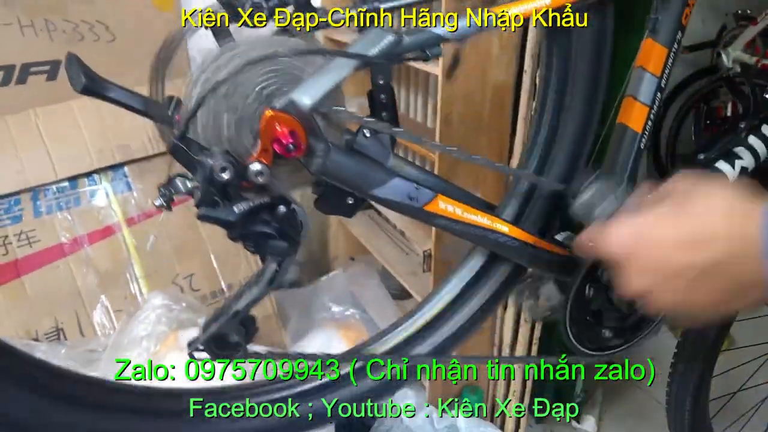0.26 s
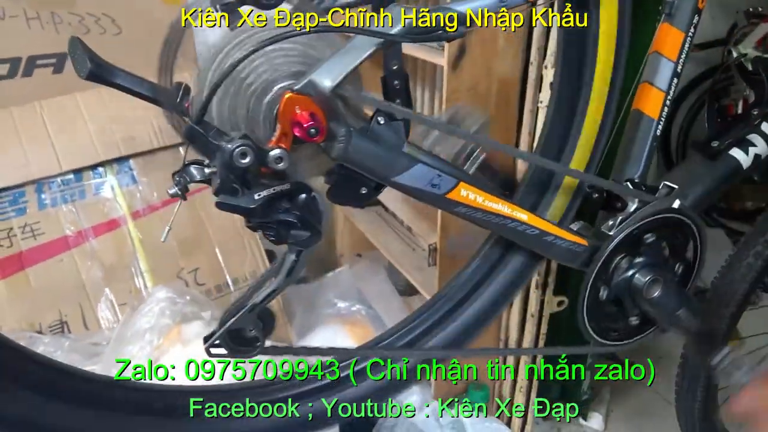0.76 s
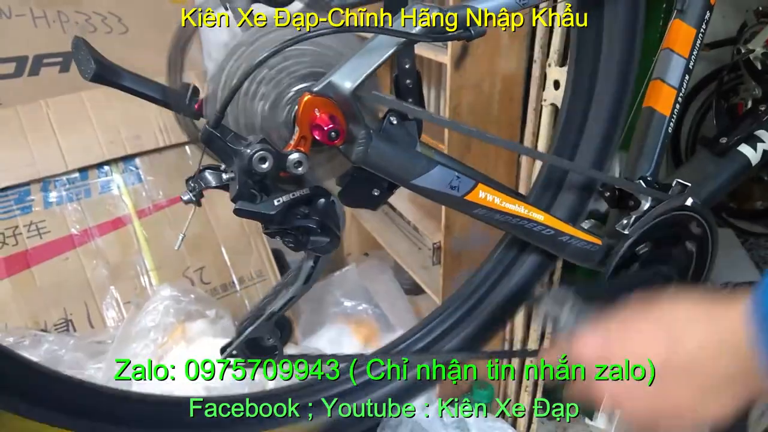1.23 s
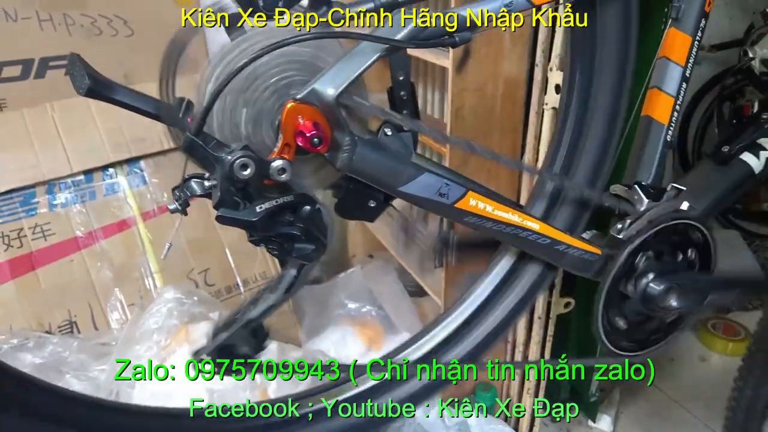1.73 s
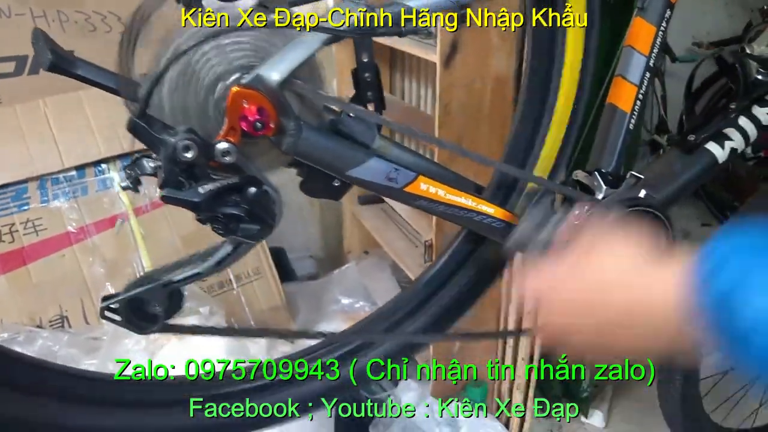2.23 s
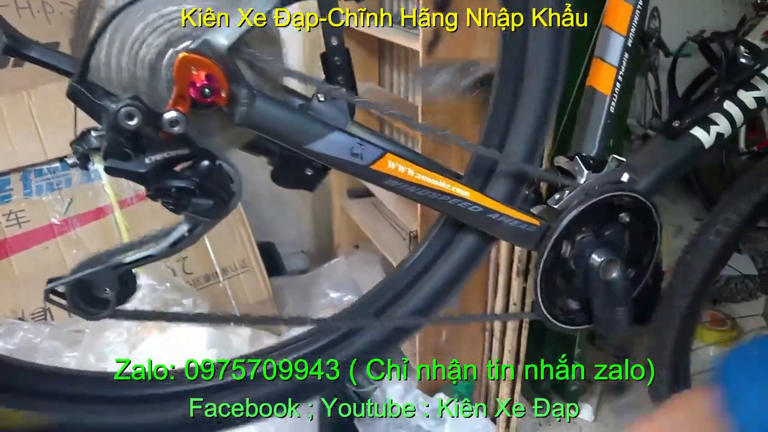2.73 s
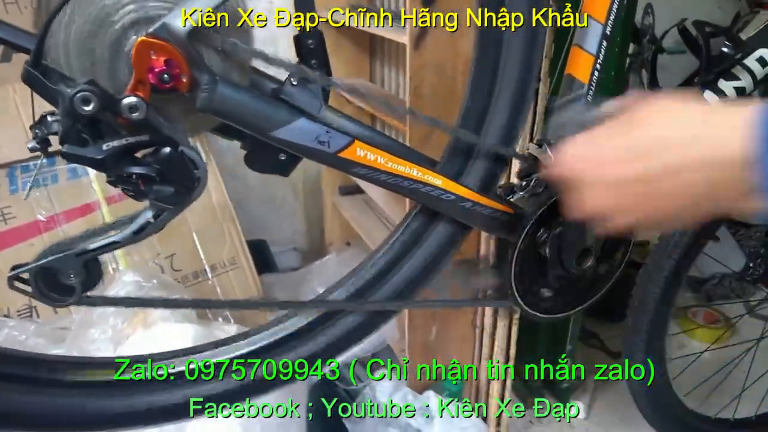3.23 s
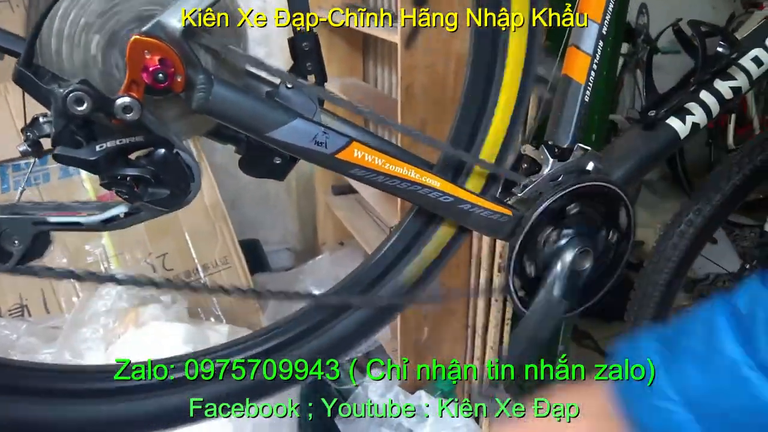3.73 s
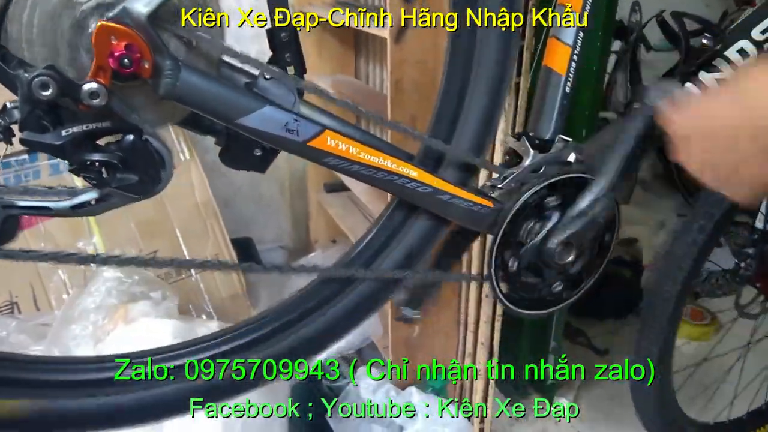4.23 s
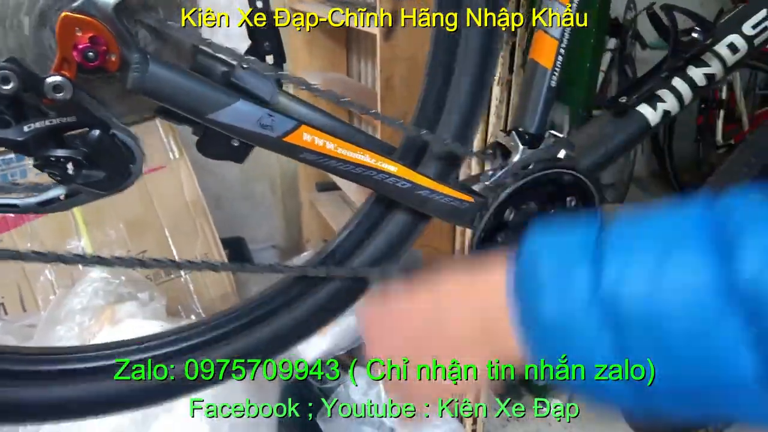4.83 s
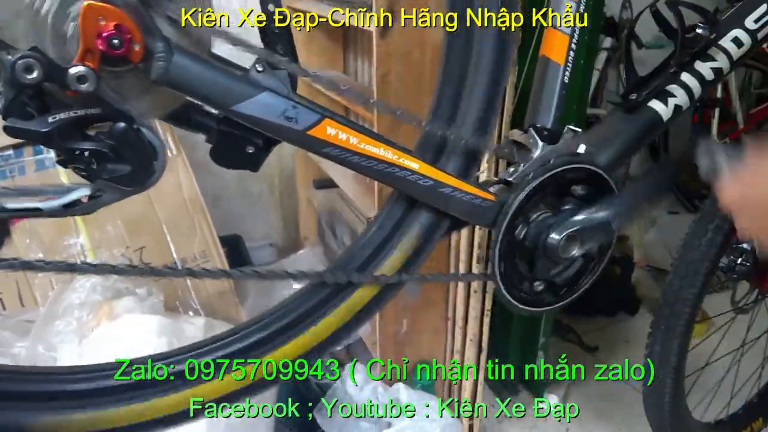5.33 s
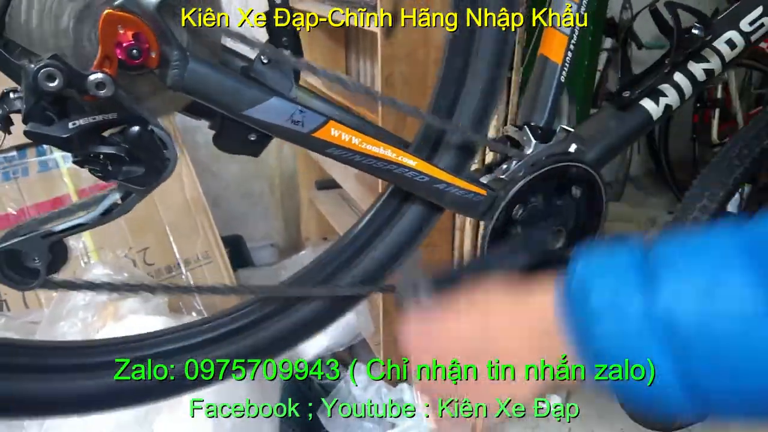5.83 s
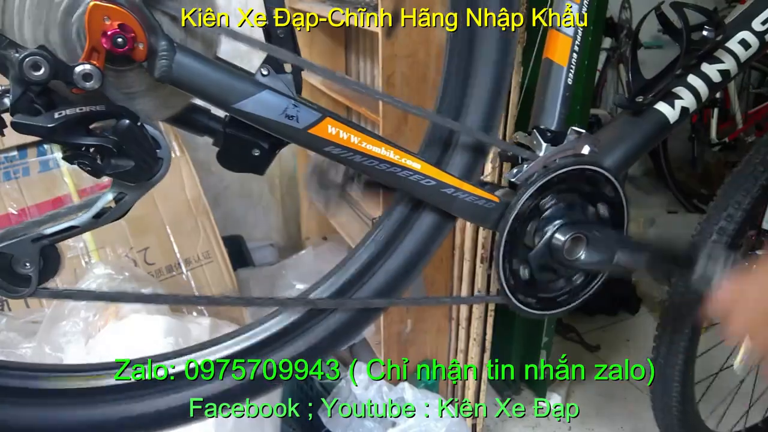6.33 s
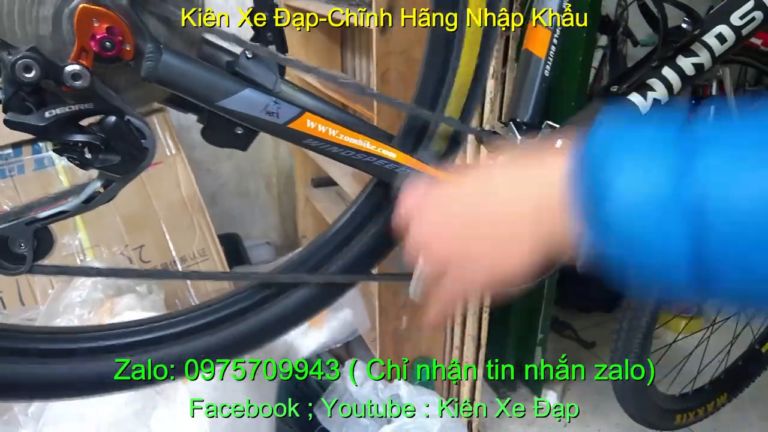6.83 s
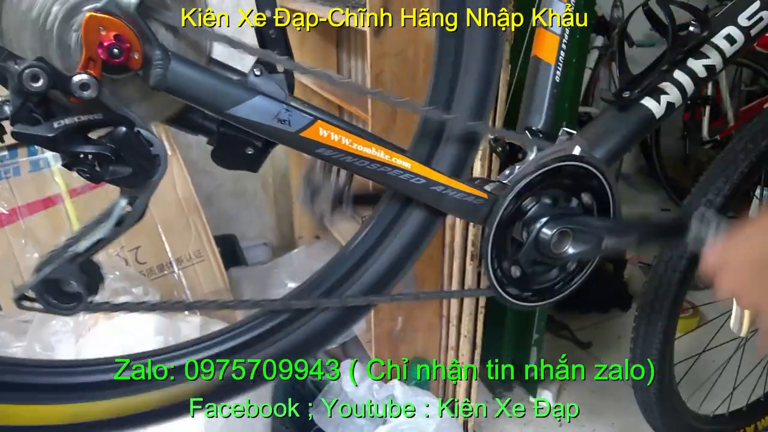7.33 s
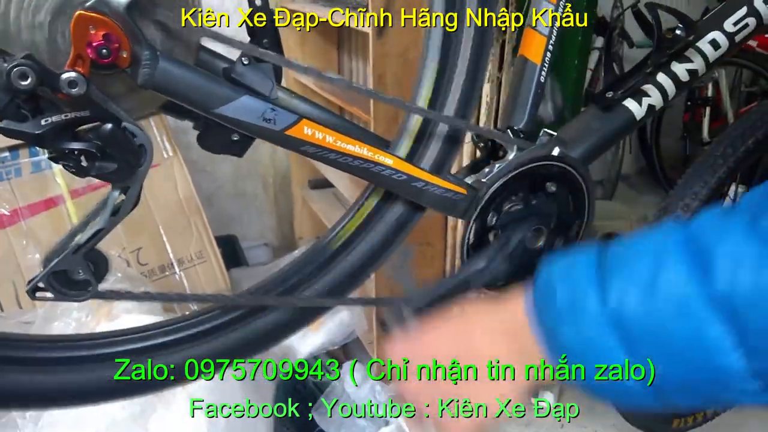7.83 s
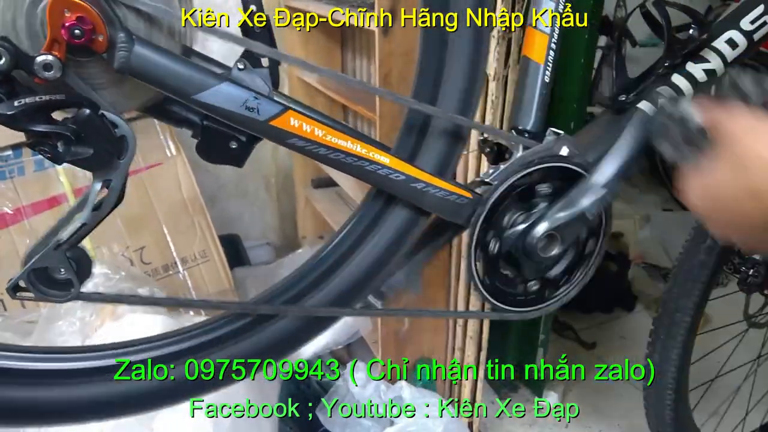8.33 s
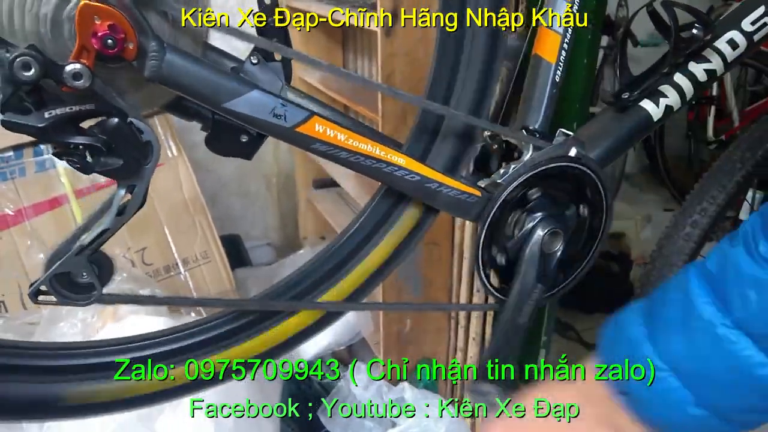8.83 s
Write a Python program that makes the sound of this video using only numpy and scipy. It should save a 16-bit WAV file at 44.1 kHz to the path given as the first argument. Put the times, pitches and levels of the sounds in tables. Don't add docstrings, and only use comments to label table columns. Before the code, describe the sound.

A bicycle chain runs over cogs with rapid bright ticks and loose metallic chatter, heard close in a small room with short echoes. Crisp clunks mark gear changes early and again late. Between them, hub pawls snap in uneven clicks with a short metallic ring. Soft bumps thud in the stand, frame tubes are knocked near the end, and a hand slides lightly on a tube.

```python
import sys
import numpy as np
from scipy import signal
from scipy.fft import rfft, irfft, next_fast_len
from scipy.io import wavfile
from scipy.ndimage import uniform_filter1d

SR = 44100
rng = np.random.default_rng(int(sys.argv[2]) if len(sys.argv) > 2 else 0)


def voltage_ratio(decibels):
    exponent = np.asarray(decibels, float) / 20
    return 10 ** exponent


def unload_wav(signal):
    wavfile.write(
        sys.argv[1],
        SR,
        np.round(np.clip(np.atleast_2d(signal).T, -1, 1) * 32767).astype(np.int16),
    )


N = 400428
SIZE = next_fast_len(N + SR)
HZ = np.fft.rfftfreq(SIZE, 1 / SR)

# (time [s], level [dB])
CHAIN_RATTLE = [(0, -35), (.45, -49), (2.0, -52.5), (2.9, -47.5), (3.3, -42.5), (4.2, -42), (4.6, -48),
                (5.1, -36), (5.4, -48), (5.6, -49.5), (6.75, -53), (7.4, -49), (8.3, -54.5), (9.08, -50.5)]
# (time [s], level [dB], time to fade by 60 dB [s])
CHAIN_SHAKES = [(1.411, -16.5, 0.51), (1.5835, -16.5, 0.33), (2.072, -25, 0.82), (3.0994, -13, 0.4),
                (3.7234, -9, 0.088), (4.9576, -19, 0.99), (5.1567, -9.5, 0.17), (5.2475, -13, 0.68),
                (6.8224, -21, 0.4), (6.9446, -21.5, 1), (7.08, -17.5, 0.42), (7.1714, -24.5, 0.97)]
# (time [s], level [dB])
STAND_RUMBLE = [(0, -58.5), (1.3, -61), (1.6, -56), (2.2, -57.5), (3.9, -57.5), (4.6, -57.5), (5.2, -48),
                (5.6, -59.5), (6.7, -60), (7.2, -50.5), (8.2, -60), (9.08, -54)]
# (time [s], level [dB])
HAND_SWAY = [
    (0.0, -66.5),
    (1.85, -65.5),
    (7.03, -64.5),
    (7.16, -57),
    (7.86, -67.5),
    (9.08, -55.5),
]
# (time [s], snap [dB], ring of the cogs above the snap [dB])
RATCHET_MOMENTS = [(0.0183, -26, -2.5), (0.081, -25.5, 1.5), (0.1894, -21.5, -4.5), (0.3128, -23, -0.5),
                   (3.811, -24, -4), (3.923, -22, -1.5), (4.0132, -23, -3), (4.1749, -23, -4.5),
                   (4.3064, -23, 0), (4.4, -24.5, -0.5), (4.4543, -26, 5.5), (4.5374, -23.5, -2.5),
                   (4.6435, -27.5, 5.7), (4.7165, -25.5, 0.6), (4.7724, -25, 1.3), (4.9075, -23.5, 0.3),
                   (5.005, -22, -1)]
RATCHET_COUNT = [0, 1, 3, 5, 6, 8, 10, 14, 17, 19, 20, 21, 22, 23, 24, 27, 29]
# (time [s], snap [dB], ring above the snap [dB])
PAWL_SLIPS = [(0.5819, -25.5, -3), (1.0063, -28.5, -0.5), (2.979, -25, 1), (3.0792, -22, -1),
              (3.1898, -23.5, -0.5), (3.2323, -24.5, -14), (3.297, -23.5, 4), (3.3251, -32.5, -3),
              (3.4439, -25.5, 4), (3.5234, -24.5, 2.5), (3.7338, -22.5, -1.5), (4.947, -31, -4),
              (5.0333, -22, -2), (5.072, -22.5, -3.5), (5.0888, -24.5, -6), (5.1118, -25, 5.5),
              (5.1569, -27, 4), (5.1717, -32, 9.5), (5.1859, -22.5, -1.5), (5.2453, -21, -13),
              (5.2714, -22, -13), (5.2919, -23, -4), (5.3403, -23.5, 0), (5.377, -21.5, -1.5),
              (5.408, -25, -6), (5.915, -31, -31), (6.8259, -25, -1.5), (7.1248, -24, -2)]
# (time [s], seating force [dB])
CHAIN_MOMENTS = [(0.4334, -40), (0.8484, -42), (1.3811, -42), (2.0382, -39.5), (2.742, -44.5),
                 (5.5172, -41), (5.7452, -46.5), (5.8403, -42.5), (6.1392, -42), (6.3117, -43.5),
                 (6.7278, -45.5), (6.9456, -48), (7.4312, -40), (7.6041, -41), (8.0493, -42.5),
                 (8.2925, -44.5), (8.41, -42.5), (9.0549, -42.5)]
CHAIN_COUNT = [0, 16, 36, 62, 89, 192, 200, 203, 214, 220, 235, 242, 260, 266, 282, 291, 295, 319]
# (time [s], level [dB])
STIFF_LINKS = [(1.0186, -44), (1.747, -42), (1.9474, -42), (1.963, -48), (2.1123, -48), (2.1293, -41),
               (2.18, -42), (2.531, -39), (2.6893, -35), (2.7604, -36), (3.028, -46), (3.3575, -40),
               (3.4185, -40), (3.6503, -37.5), (3.7774, -35.5), (5.4676, -37.5), (5.6041, -30),
               (5.624, -38), (5.8681, -42), (5.8805, -43), (6.087, -38.5), (6.1385, -43), (6.7623, -43),
               (6.8838, -34.5), (6.99, -46), (7.2385, -35), (7.678, -34), (7.7856, -36.5), (5.7744, -38),
               (8.8692, -41)]
# (time [s], thump [dB], edge above the thump [dB])
STAND_BUMPS = [(0.823, -40.5, -17), (0.926, -44, -21), (1.5, -32.5, -13), (1.962, -41.5, -24),
               (4.764, -41.5, 4.5), (5.181, -47, 4), (5.284, -34.5, 5), (6.136, -42, -16),
               (6.185, -40.5, -30), (6.892, -40.5, 4), (7.089, -37, -1), (7.64, -36.5, -7),
               (8.12, -38.5, -10.5)]
# (time [s], snap [dB], ring above snap [dB], thud above snap [dB], rattle [s])
GEAR_CLUNKS = [
    (1.4102, -9, -7, -17, 0.0031),
    (1.581, -22.5, 6.5, -12.5, 0.003),
    (2.0722, -17.5, -11, -26, 0.0027),
    (3.098, -12.5, 0, -17, 0.004),
    (3.707, -18, -13, -21, 0.0059),
    (7.077, -38, 7, -27, 0.0032),
    (7.135, -16, -11, -21, 0.0079),
    (7.1644, -10.5, -11.5, -23, 0.0035),
]
# (time [s], low tubes [dB], middle tube above them [dB], sharpness above them [dB])
FRAME_KNOCKS = [
    (7.372, -28, -8, 8.5),
    (7.539, -39, -15, -10),
    (8.436, -32, 1, 8),
    (8.489, -43.5, 3, 6),
    (9.005, -59.5, 7.5, 25.5),
]
# (time [s], level [dB])
HAND_RUB = [
    (8.79, -77),
    (8.84, -49),
    (8.92, -48.5),
    (8.97, -63),
    (9.04, -48),
    (9.08, -63),
]
# (pitch [Hz], width [Hz], level [dB])
RUB_TUBE_TONES = [(802, 27, -1), (888, 32, -0.98)]

# (pitch [Hz], level [dB], time to fade by 60 dB [s])
COG_TONES = [(2027, -15.5, 0.23), (2257, -9.5, 0.12), (2437, -5.5, 0.16), (2808, -3.5, 0.18),
             (3570, -18, 0.36), (3748, -9, 0.14), (4845, -15.5, 0.34), (5696, 3.5, 0.03)]
LINK_TONES = [(3493, -2.5, 0.041), (5860, -5, 0.02), (9450, 20.5, 0.0026)]
TUBE_TONES = [(352.2, 0.5, 0.26), (436.2, 1, 0.24), (880, -4.5, 0.48), (1270, -34, 1), (1303, -14, 0.17),
              (1782, -6, 0.27), (2100, -6, 0.2), (2530, -29, 0.2), (2740, -40, 0.59)]
# (frequency [Hz], level per Hz [dB])
PAWL_NOISE = [(700, -16.5), (1300, -6.5), (1900, -19), (2400, 3), (2900, -1.5), (3700, -0.5), (4300, -11.5),
              (5700, 3.5), (7000, -6), (9200, 1), (12000, -6.5), (14500, 2.5), (16500, -0.5)]
CLUNK_NOISE = [(80, -35), (150, 10), (500, -1.5), (1000, 9), (2200, 1), (3500, 6), (7000, -9.5),
               (13900, -15), (16500, -20)]
ROLLER_NOISE = [(1060, -12), (1800, -2.5), (3140, -4.5), (3350, 7), (3950, -2), (5540, 0.5), (6800, -6),
                (8590, -6.5), (16000, -18.5)]
KNOCK_NOISE = [(71, -52), (120, -0.5), (374, 0), (705, -5.5), (891, 0), (1560, -5), (2780, -5), (6160, -22),
               (9000, -25.5), (11700, -47), (19800, -120)]
RUMBLE_NOISE = [(59, -16), (100, -11.5), (167, 0.5), (452, -7.5), (796, -2.5), (948, -4.5), (1180, -3),
                (1880, -11), (2500, -8), (3250, -4.5), (5500, -120)]
SWAY_NOISE = [(20, -8.5), (40, -9), (52, -2.5), (75, -5.5), (110, -11.5), (160, -64)]
# (frequency [Hz], left minus right [dB])
PORT_BALANCE = [(60, -1), (240, -6), (480, -3.5), (950, -1), (1890, -2), (3770, -6.5), (6500, -1),
                (9800, 4), (15000, 0)]
# (frequency [Hz], likeness [-1 to 1])
PORT_LIKENESS = [(60, 0.74), (180, 0.76), (550, 0.6), (1650, 0.21), (4970, 0.041), (15000, 0.018)]
# (frequency [Hz], time to fade by 60 dB [s])
SHOP_FADE = [(200, 0.73), (1000, 0.42), (4000, 0.12), (12000, 0.21)]


def evened(x):
    return x / np.sqrt(np.mean(x ** 2) + 1e-20)


def read(points, hz):
    f, value = np.transpose(points)
    return np.interp(np.log(hz + 1), np.log(f + 1), value)


def curve(rows):
    return np.interp(np.arange(N) / SR, *np.transpose(rows))


def alike(first, other, hz):
    same = np.clip(read(PORT_LIKENESS, hz), -1, 1)
    return same * first + np.sqrt(1 - same ** 2) * other


def pair_noise(count, length):
    z = rfft(rng.standard_normal((count, 2, length)))
    second = alike(z[:, 0], z[:, 1], np.fft.rfftfreq(length, 1 / SR))
    return np.stack([z[:, 0], second], 1)


def blows(events, rattle_s, lead_db, count, size, spread=1):
    draw = rng.random((events, count, 2))
    wait = (-np.log(1 - draw[..., 0])) ** spread
    late = wait * np.reshape(rattle_s, (-1, 1)) * (np.arange(count) > 0)
    force = np.cos(2 * np.pi * draw[..., 1])
    force[:, 0] = voltage_ratio(lead_db)
    out = np.zeros((events, size))
    at = np.minimum(late * SR, size / 2).astype(int)
    np.add.at(out, (np.arange(events)[:, None], at), force)
    return rfft(out / np.linalg.norm(out, axis=1)[:, None])[:, None]


def bodies(events, colour, crack_t60, modes, modes_db, vary_db, size, rough=0.):
    t, bins = np.arange(size) / SR, np.fft.rfftfreq(size, 1 / SR)
    knots = rng.standard_normal((events, 9))
    place = np.sqrt(bins / bins[-1])
    ripple = np.array([np.interp(place, np.linspace(0, 1, len(k)), k) for k in knots])
    shade = voltage_ratio(read(colour, bins) + vary_db * ripple)
    crack = irfft(pair_noise(events, size) * shade[:, None])
    fade = voltage_ratio(-60 * t / crack_t60) + 0.31 * voltage_ratio(-60 * t / 0.0018)
    crack *= fade / crack.std(axis=(1, 2), keepdims=True)

    hz, db, t60 = np.repeat(modes, 2, axis=0).T
    hz = hz * np.tile([.996, 1.004], len(modes))
    likeness = np.clip(read(PORT_LIKENESS, hz), -1, 1)
    lag = np.arccos(likeness) * rng.standard_normal((events, 1, len(hz))) * [[0], [1]]
    chance_db = vary_db * rng.standard_normal((events, 1, len(hz)))
    swing = voltage_ratio(modes_db + db + chance_db) * np.exp(1j * lag)
    tones = voltage_ratio(-60 * t / t60[:, None]) * np.exp(2j * np.pi * hz[:, None] * t)
    ring = (swing @ tones).imag
    shiver = evened(uniform_filter1d(rng.standard_normal((events, 1, size)), round(.004 * SR)))
    ring *= 1 - rough + rough * shiver
    ring *= np.minimum(t / 0.0037, 1)
    return rfft((crack + ring) * signal.windows.tukey(2 * size, .5)[size:])


def band(db, lo_hz, hi_hz, size):
    jw = 1j * np.fft.rfftfreq(size, 1 / SR)
    shape = (jw / lo_hz) ** 2 / (1 + np.sqrt(2) * jw / lo_hz + (jw / lo_hz) ** 2)
    if hi_hz:
        shape /= 1 + np.sqrt(2) * jw / hi_hz + (jw / hi_hz) ** 2
    return voltage_ratio(db)[:, None, None] * shape


def levelled(spectra):
    hz = np.fft.rfftfreq(2 * spectra.shape[2] - 2, 1 / SR)
    treble = irfft(spectra * (hz > 4200))[..., :350]
    return spectra / treble.std(axis=(1, 2), keepdims=True)


def counted(rows, teeth, vary, extra):
    every = np.arange(teeth[-1] + 1)
    steady = np.array([np.interp(every, teeth, col) for col in np.transpose(rows)]).T
    scattered = steady + np.multiply(vary, rng.standard_normal(steady.shape))
    return np.vstack([scattered, extra]).T


def placed(s, spectra):
    out = np.zeros((2, SIZE))
    for at, sound in zip((s * SR).astype(int), irfft(spectra)):
        out[:, at:at + sound.shape[1]] += sound
    return out


def chatter():
    kinds, t = 5, np.arange(N) / SR
    shaken = 0
    for s, db, t60 in CHAIN_SHAKES:
        fade_s = np.where(t > s, t60, .03)
        shaken = shaken + voltage_ratio(2 * (db - 9.0 - 60 * abs(t - s) / fade_s))
    taps = (rng.random((kinds, N)) < 300 / SR) * rng.choice([-1, 1], (kinds, N))
    taps = taps * voltage_ratio(4.4 * np.minimum(rng.exponential(1, (kinds, N)), 5))
    taps = evened(taps) * voltage_ratio(-23) * np.sqrt(voltage_ratio(2 * curve(CHAIN_RATTLE)) + shaken)
    links = bodies(kinds, ROLLER_NOISE, 0.0073, LINK_TONES, -46, 4.2, size=2048)
    links = irfft(links * band(np.zeros(kinds), 1480, None, size=2048))
    return irfft((rfft(taps, SIZE)[:, None] * rfft(links, SIZE)).sum(0), SIZE)


def hum(colour, db, lumpy_db, lump_s):
    noise = evened(irfft(pair_noise(1, SIZE)[0] * voltage_ratio(read(colour, HZ)), SIZE)[:, :N])
    lumps = evened(uniform_filter1d(rng.standard_normal(N), int(lump_s * SR)))
    return noise * voltage_ratio(db + lumpy_db * lumps)


def rumble():
    return hum(RUMBLE_NOISE, curve(STAND_RUMBLE) + 3, 3.1, .03)


def sway():
    return hum(SWAY_NOISE, curve(HAND_SWAY), 0.81, 0.071)


def pawls():
    vary = [0, 0.25, 1.5]
    s, db, ring_db = counted(RATCHET_MOMENTS, RATCHET_COUNT, vary, PAWL_SLIPS)
    cogs = bodies(len(s), PAWL_NOISE, 0.043, COG_TONES, -12.5, 1.3, size=8192, rough=0.34)
    snap = band(db, 3600, None, size=8192)
    ring = band(db + ring_db + 5.0, 1430, 3220, size=8192)
    hits = blows(len(s), .002, 8, count=5, size=8192)
    return placed(s, levelled(hits * cogs) * (snap - ring))


def rollers():
    vary = [0.0008, 1.2]
    s, db = counted(CHAIN_MOMENTS, CHAIN_COUNT, vary, STIFF_LINKS)
    links = bodies(len(s), ROLLER_NOISE, .016, LINK_TONES, -11, 2.2, size=2048)
    rattle_s = np.where(s < GEAR_CLUNKS[0][0], .0042, .0017)
    ticks = levelled(blows(len(s), rattle_s, 5, count=9, size=2048) * links)
    return placed(s, ticks * band(db + 0.5, 4550, None, size=2048))


def bumps():
    s, db, edge_db = np.transpose(STAND_BUMPS)
    stand = bodies(len(s), KNOCK_NOISE, 0.07, TUBE_TONES, -26, 0.36, size=8192)
    thump = band(db + 1.5, 165, 620, size=8192)
    edge = band(db + edge_db + 6.5, 1000, 4400, size=8192)
    hits = blows(len(s), 0.0065, 1.0, count=6, size=8192)
    return placed(s, hits * stand * (thump - edge))


def clunks():
    s, db, ring_db, thud_db, rattle_s = np.transpose(GEAR_CLUNKS)
    cogs = bodies(len(s), CLUNK_NOISE, 0.047, COG_TONES, -11.5, 1.0, size=16384, rough=0.34)
    snap = band(db + 9, 9450, None, size=16384)
    ring = band(db + ring_db + 7.5, 2870, 3540, size=16384)
    thud = band(db + thud_db + 8.0, 96, 1500, size=16384)
    hits = blows(len(s), 1.8 * rattle_s, -22.0, count=24, size=16384, spread=.55)
    return placed(s, hits * cogs * (snap - ring + thud))


def knocks():
    s, db, mid_db, sharp_db = np.transpose(FRAME_KNOCKS)
    tubes = bodies(len(s), KNOCK_NOISE, 0.15, TUBE_TONES, -8.5, 0.32, size=32768)
    low = band(db - 3.5, 53, 500, size=32768)
    middle = band(db + mid_db + 6.5, 620, 700, size=32768)
    sharp = band(db + sharp_db - 0.5, 1620, 12000, size=32768)
    hits = blows(len(s), 0.003, 12, count=6, size=32768)
    return placed(s, hits * tubes * (low - middle + sharp))


def rub():
    tones = sum(voltage_ratio(db) / (1 + ((HZ - hz) * 2 / width) ** 2) for hz, width, db in RUB_TUBE_TONES)
    friction = irfft(pair_noise(1, SIZE)[0] * tones, SIZE)[:, :N]
    return evened(friction) * voltage_ratio(curve(HAND_RUB))


def shop():
    taps = np.zeros((2, SR // 2))
    slots = np.arange(300, SR // 2 - 20, 20)
    at = slots + rng.integers(0, 20, (2, len(slots)))
    np.put_along_axis(taps, at, rng.choice([-1., 1.], at.shape), 1)
    hz, t, z = signal.stft(taps, SR, nperseg=256)
    fade = voltage_ratio(-60 * t / read(SHOP_FADE, hz)[:, None])
    tail = signal.istft(z * fade, SR, nperseg=256)[1]
    left, other = rfft(tail / np.linalg.norm(tail[0]), SIZE)
    return np.array([left, alike(left, other, HZ)])


def scene():
    bike = chatter() + pawls() + rollers() + bumps() + clunks() + knocks()
    echoes = irfft(rfft(bike.mean(0)) * shop(), SIZE)
    return (bike + voltage_ratio(-9.0) * echoes)[:, :N] + rumble() + sway() + rub()


def top_cut(x):
    return signal.sosfilt(signal.butter(12, 16960, fs=SR, output="sos"), x)


def record(dry):
    half_db = read(PORT_BALANCE, HZ) / 2
    balance = voltage_ratio(np.array([half_db, -half_db]))
    edge = np.where(HZ < 15850, 1, voltage_ratio(-20)) * (HZ < 16960)
    ports = irfft(rfft(dry, SIZE) * balance * edge, SIZE)[:, :N]
    return top_cut(ports)


dry = scene()
out = record(dry)
unload_wav(out)
```